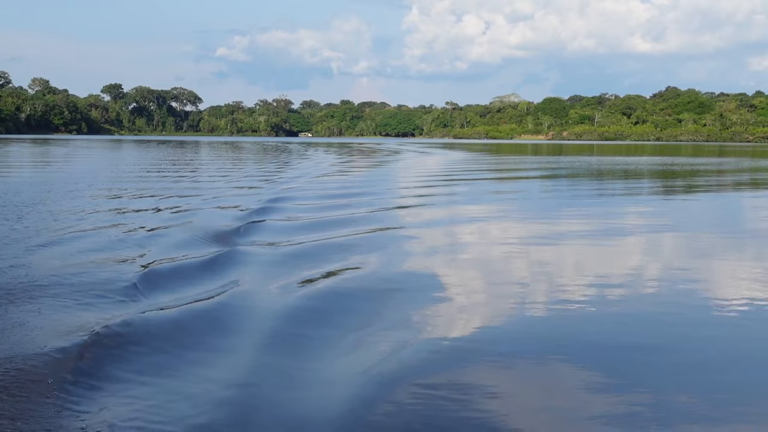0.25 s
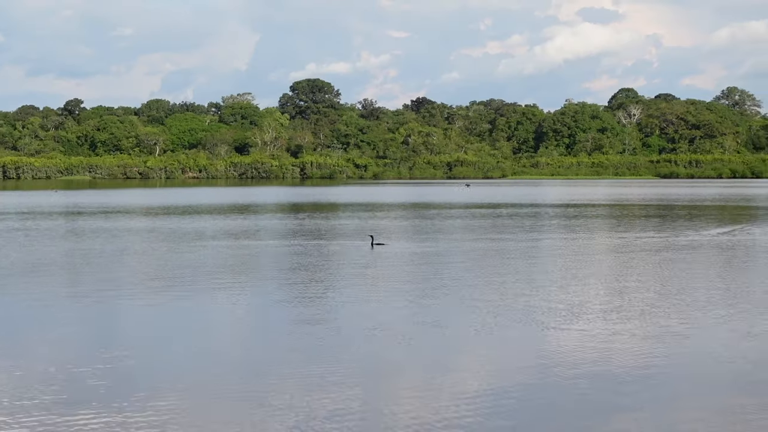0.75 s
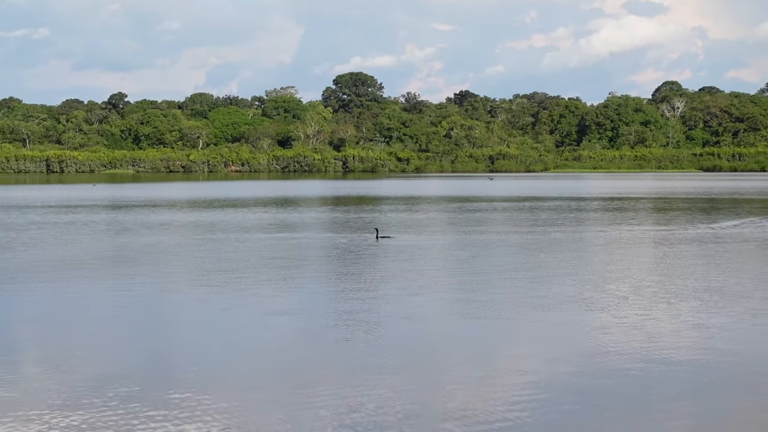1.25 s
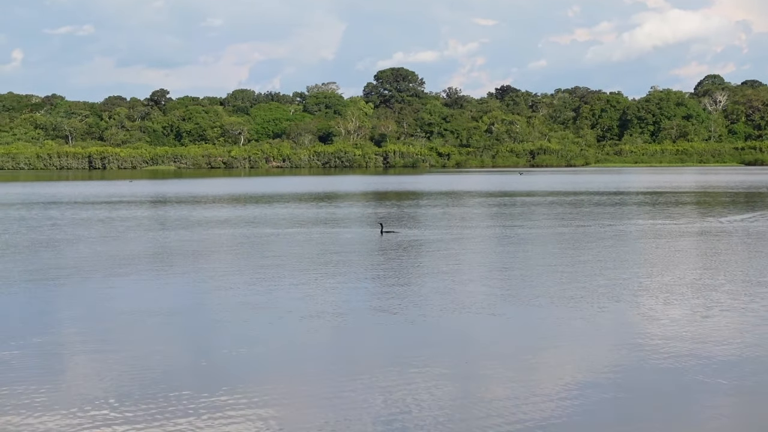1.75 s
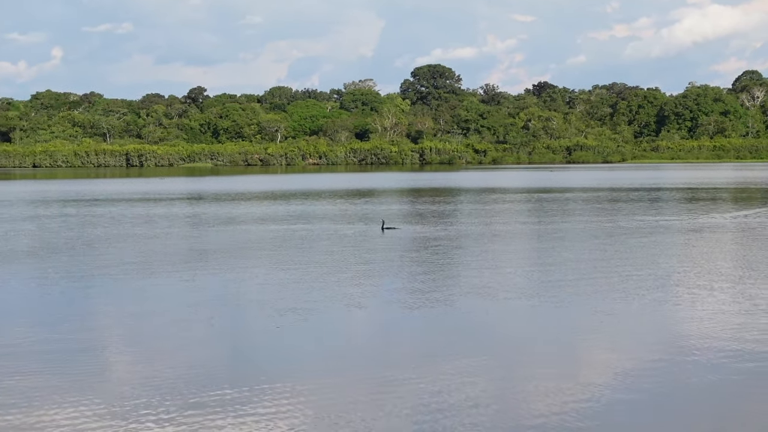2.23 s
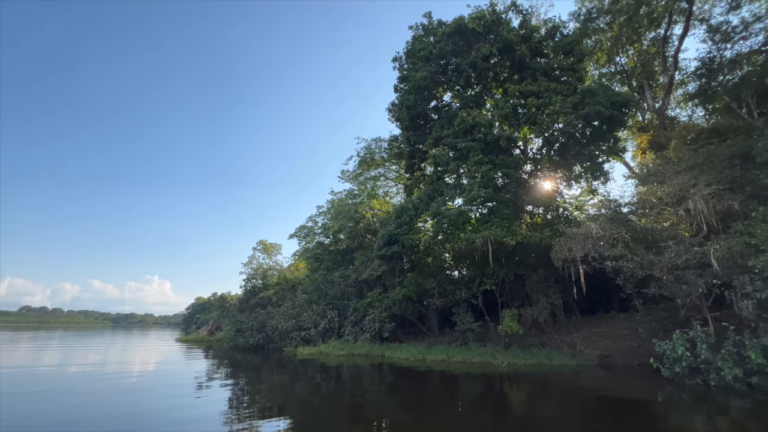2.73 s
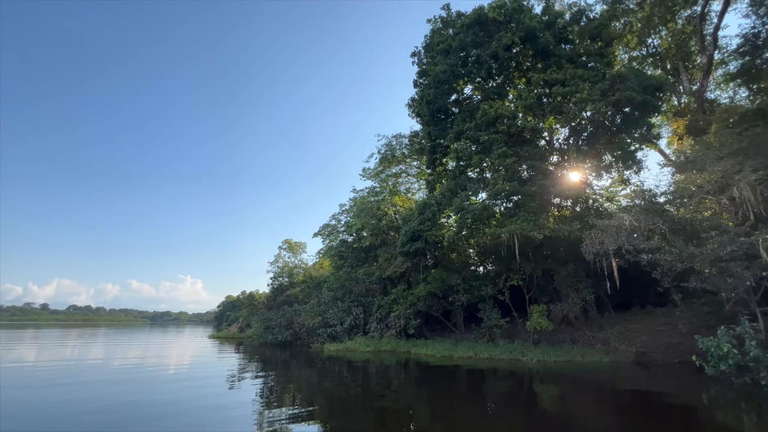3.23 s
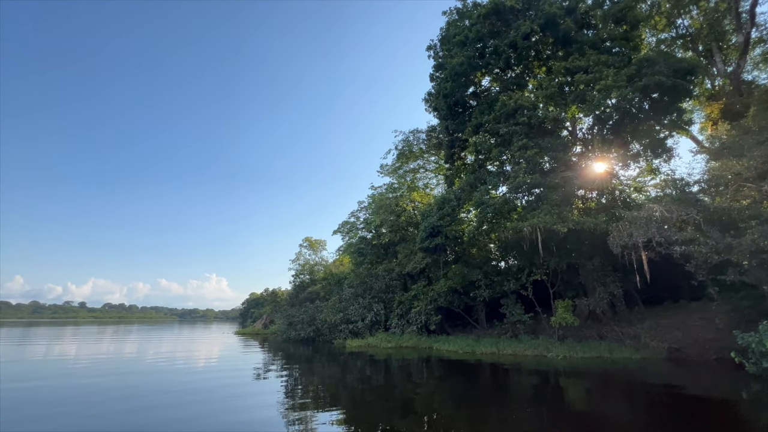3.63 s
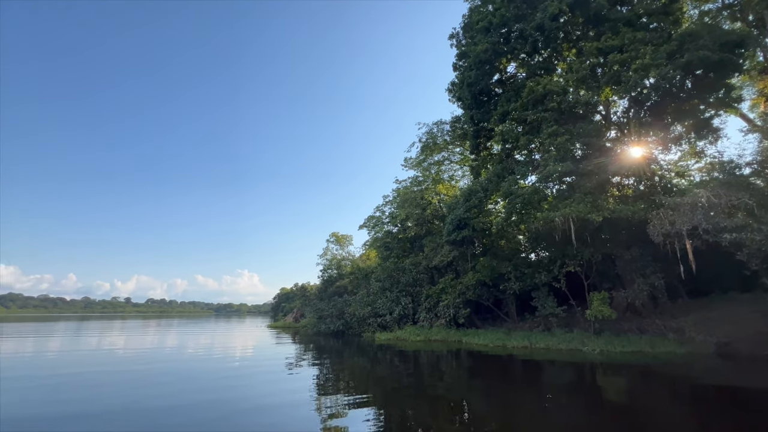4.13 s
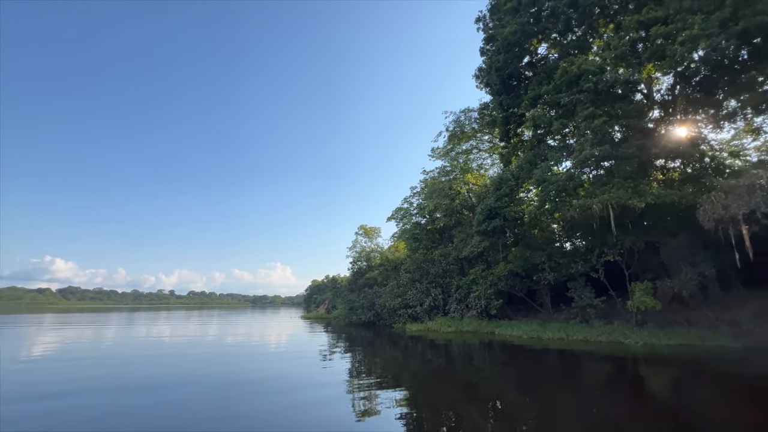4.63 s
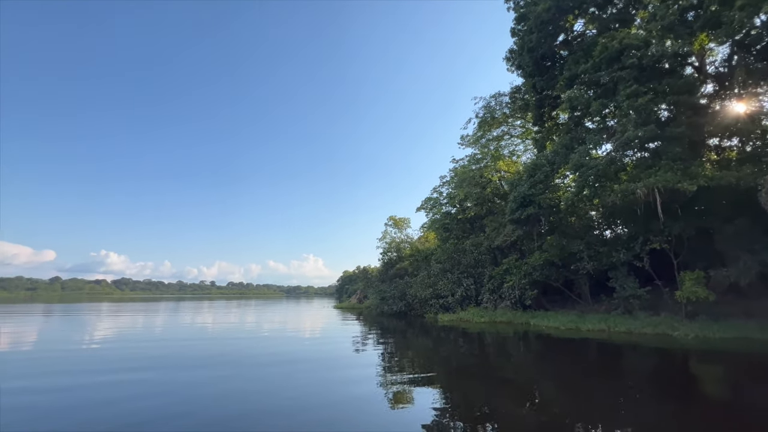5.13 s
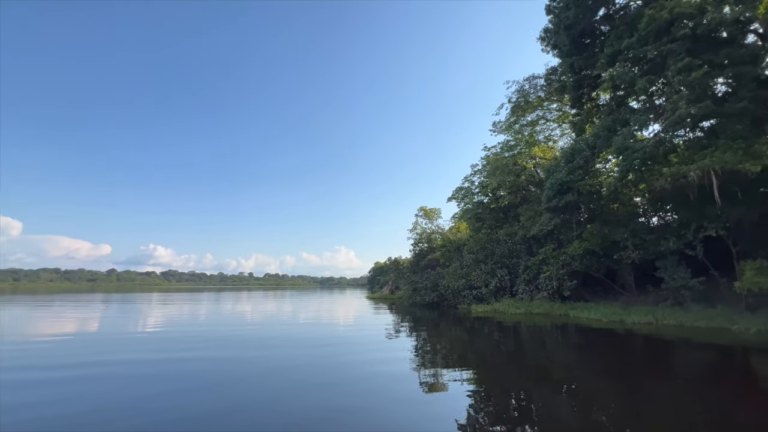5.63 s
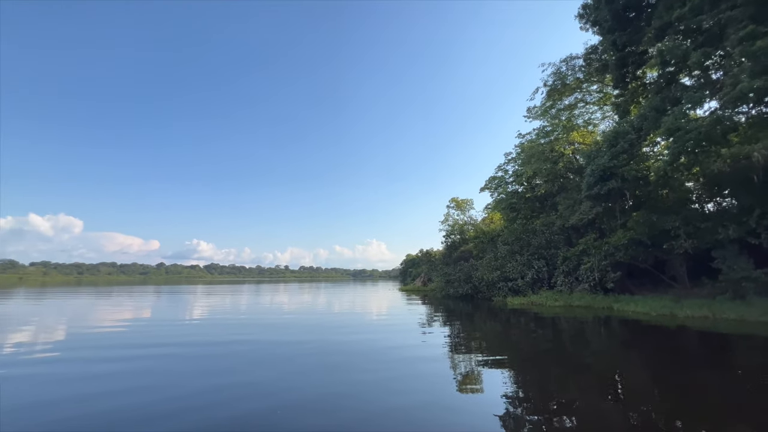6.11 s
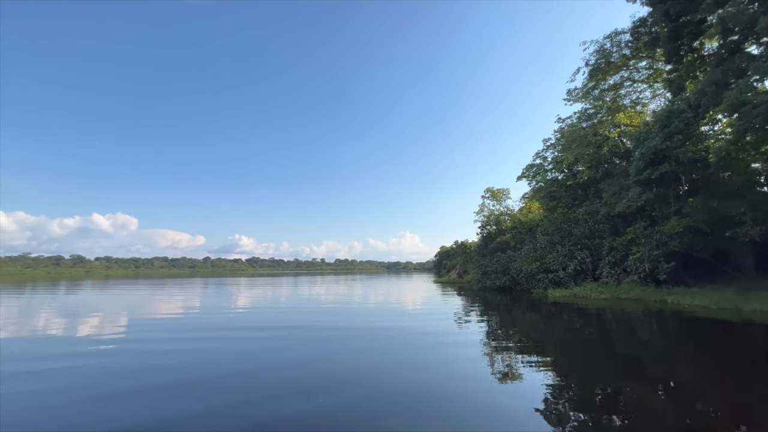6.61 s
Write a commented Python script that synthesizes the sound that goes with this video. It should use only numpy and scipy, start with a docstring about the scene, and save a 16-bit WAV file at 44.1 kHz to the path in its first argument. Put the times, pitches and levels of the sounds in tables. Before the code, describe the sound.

A small outboard motor putters close by, slows abruptly and fades, then shrill forest insects buzz while a paddle knocks on a hull.

```python
"""A small single-cylinder outboard drives a boat over a lake: exhaust throb, a clattering casing, valve taps.
It is heard close, then abruptly a little slower and further to the left, and then the sound fades out. Then the
boat drifts by a forest full of shrill insects, made of narrow bands of pulsing noise. A paddle knocks on the
hull (dying noise and low tones), water laps (soft noise), and a far bird whistles (gliding sine tones with an
echo from the trees)."""
import sys
import numpy as np
from scipy import signal
from scipy.fft import rfft, irfft, next_fast_len
from scipy.io import wavfile
from scipy.ndimage import map_coordinates

SR = 44100
rng = np.random.default_rng(int(sys.argv[2]) if len(sys.argv) > 2 else 0)


def transcribe(signal):
    """Save signal, clipped to [-1, 1], as a 16-bit WAV file at the path in sys.argv[1]."""
    frames = np.atleast_2d(signal).T
    limited = np.clip(frames, -1, 1)
    pcm = np.round(limited * 32767).astype(np.int16)
    wavfile.write(sys.argv[1], SR, pcm)


N = 302526
TIME = np.arange(N) / SR  # seconds

# Exhaust tones of the two stretches. Each row: multiple of the firing rate, level in dB.
FAST_ORDERS = [(3, -18), (4, -33), (5, -9), (6, -6), (7, -18), (8, -1), (9, -1.5), (10, -8.5), (11, -8.5),
               (12, 2), (13, -5.5), (14, -5.5), (15, -12.5), (16, -11), (17, 4), (18, -3), (19, -3),
               (22, -6), (24, -4), (31, -3)]
SLOW_ORDERS = [(3, -30), (4, -15), (5, -7.5), (6, 1.5), (7, -2.5), (8, 0), (9, -11), (10, -1.5), (11, -6.5),
               (12, 0), (14, -12), (16, -5.5), (20, 0), (21, -9), (25, -11), (33, -12)]
# Engine levels. Each row: time in seconds, exhaust in dB, clatter in dB, lift of the deepest tones in dB.
FAST_LEVEL = [(0, -17.5, -13, -1), (0.25, -22.5, -12.5, 0.5), (0.45, -21, -12, 0.5), (0.73, -21, -13, 0)]
SLOW_LEVEL = [(0.75, -21, -16.5, -5), (1.42, -22, -15.5, -5), (1.55, -21.5, -15, 0)]
# Colour of the clatter. Each row: pitch in Hz, level in dB per Hz.
FAST_CLATTER = [(30, -34), (70, -19), (130, -6), (250, 1), (450, -4.5), (800, -6), (1300, -4), (2200, -9.5),
                (3000, -15), (4000, -21.5), (6000, -26.5), (9000, -33.5), (15500, -41.5)]
SLOW_CLATTER = [(30, -35), (70, -26), (110, -12), (180, 4), (300, -0.5), (500, -3), (800, -8), (1300, -7.5),
                (2200, -12), (3400, -19.5), (5500, -23.5), (9500, -37), (15500, -43.5)]
# Resonances of the casing. Each row: pitch in Hz, width in Hz, lift in dB.
FAST_CASING = [(360, 27, 3.5), (517, 14, 4.5), (704, 19, 6), (880, 19, -1.5), (906, 13, 12), (1023, 50, 11),
               (1144, 15, 6), (1400, 25, 5), (1488, 39, 6.5), (1700, 18, 5.5), (1710, 14, -17),
               (2040, 57, 5.5), (2350, 30, -2.5), (2493, 27, 2.5), (2567, 30, 8), (2850, 70, -3.5),
               (3240, 36, 4)]
SLOW_CASING = [(165, 6.9, 3.7), (356, 18, 4), (521.5, 16, 4), (691, 41, 6.9), (895, 16, 5.8),
               (1037, 55, 13), (1307, 21, 3.9), (1424, 10, 10.6), (1515, 64, 5.3), (1680, 43, 4.4),
               (1885, 44, 9.4), (2040, 32, 7.6), (2520, 31, 4.3), (2740, 18, 1), (3040, 11, 6.1),
               (3240, 23, 6.4)]
# How far left the engine sounds. Each row: pitch in Hz, left minus right in dB.
FAST_SIDE = [(200, 0), (700, 1.5), (4400, 1.5), (8000, 0)]
SLOW_SIDE = [(60, 1), (200, -0.4), (380, 1.6), (700, 3.5), (1290, 6), (2380, 5.5), (4400, 8), (8120, 2.5),
             (11000, 6), (15000, -4)]
# How the clatter swells within a cycle. Each row: swells per cycle, depth as a share.
FAST_BEATS = [(1, 0.064), (2, 0.042), (3, 0.034), (4, 0.039)]
SLOW_BEATS = [(1, 0.056), (2, 0.051), (3, 0.047), (5, 0.046)]
# Colour of a valve tap. Each row: pitch in Hz, level in dB per Hz.
TAP_COLOUR = [(1500, -18), (2300, -1), (2650, -2), (3100, -8), (3900, -12), (5200, -14), (7500, -17),
              (10000, -25.5), (15500, -31)]
# Valve taps that stand out. Each row: time in seconds, dB over the usual.
HARD_TAPS = [(.202, 7.5), (.257, 4.5), (.312, 1.5), (.697, 4), (1.442, 6.5), (1.813, 5)]
# So small a motor radiates little deep bass. Each row: pitch in Hz, gain in dB.
SMALL_MOTOR_BASS = [(30, -6), (55, 0)]

# Colour of the mass of insects, a low and a high choir. Each row: pitch in Hz, level in dB per Hz.
LOW_CHOIR = [(4900, -39), (5500, -20), (5800, -6.5), (6080, 3.5), (6150, 1.5), (6230, 7), (6480, -28),
             (6750, 4), (6950, 3), (7060, -1), (7200, -10.5), (7700, -18.5), (8100, -60)]
HIGH_CHOIR = [(7400, -47), (7850, -19), (8150, -14), (8230, -3), (8350, -3), (8600, -7), (8770, 1),
              (8900, -6), (9020, 0.5), (9180, -20), (9320, -22), (9440, -8.5), (9620, -28), (9850, -77)]
# Bouts of buzzing of one insect. Each row: middle in seconds, length in seconds, level in dB.
BUZZES = [(3.97, .2, -67), (5.0, 0.56, -69), (6.17, 0.98, -64.5)]
# Colour of a broader insect hiss. Each row: pitch in Hz, level in dB per Hz.
SIZZLE_COLOUR = [(3800, -21), (4600, -4), (5250, 0), (5900, -1), (7000, -30)]
# Direction of the forest. Each row: time in seconds, left minus right in dB.
FOREST_BEARING = [(2.6, -2.8), (4.3, -2.3), (5.6, -1), (6.86, 0)]
# Colour of the hush of lake and forest. Each row: pitch in Hz, level in dB per Hz.
AIR_COLOUR = [(15, -50), (25, -17), (87, -12), (151, -1.5), (382, -5.5), (466, -7), (622, -8), (727, -11),
              (1040, -14), (1510, -11.5), (1840, -16), (3430, -26.5), (5000, -26.5), (6500, -54),
              (11000, -120)]
# Tones in the hush. Each row: pitch in Hz, width in Hz, lift in dB.
SHORE_TONES = [(1054, 35, 6.5), (1550, 55, 0), (1840, 76, -3), (2250, 60, 2.5)]
# Colour of the lapping water. Each row: pitch in Hz, level in dB per Hz.
LAP_COLOUR = [(50, -30), (130, -2.5), (280, -1.5), (600, -13), (1500, -21), (4500, -28), (9000, -56)]

# Paddle on the hull. Each row: time in seconds, clack in dB, lowest pitch in Hz, brightness limit in Hz,
# hull in dB, ring time of the clack as a multiple of the usual.
KNOCKS = [(3.04, -61, 100, 1500, -56.5, 0.91), (3.555, -55, 600, 3500, -72, .6),
          (3.981, -42.5, 1100, 2900, -78, 0.38), (5.647, -32, 100, 3230, -41.5, 1),
          (5.844, -35, 100, 3100, -43.5, 0.95), (6.353, -33, 100, 8500, -39.5, 1),
          (6.393, -43, 100, 3400, -47, 1)]
# Colour of the clack. Each row: pitch in Hz, level in dB per Hz.
CLACK_COLOUR = [(100, -24), (300, -2.5), (800, -10.5), (1250, -1.5), (2100, -3), (3000, -9), (5300, 4.5),
                (7500, -4), (10000, -40)]
# How long the clack rings. Each row: pitch in Hz, time to die by 60 dB in seconds.
CLACK_T60 = [(200, 0.82), (700, 0.36), (1500, 0.2), (3000, 0.11), (6000, 0.064)]
# Resonances of the clack. Each row: pitch in Hz, width in Hz, lift in dB.
WOOD = [(590, 39, 8), (915, 36, 6.5), (1266, 60, 3), (1560, 37, 4), (1850, 80, -1.5), (2220, 60, 1.5),
        (2330, 69, -3.5), (2640, 32, 4), (2940, 70, 9), (3420, 80, -1), (4380, 140, -10)]
# Low tones of the hull, varied a little per knock. Each row: pitch in Hz, level in dB,
# time to die by 60 dB in seconds.
HULL = [(92.7, -16, 0.46), (125.5, -1.5, .45), (167.5, 2, 0.53), (193.2, 0.5, .5), (249, 5.5, 0.56),
        (322, -2.5, 0.48), (409, 3, 0.39)]
# Dull booms of the hull that follow the knocks. Each row: time in seconds, pitch in Hz, level in dB,
# time to die by 60 dB in seconds.
BOOMS = [(3.145, 170, -48, .2), (5.718, 125, -36.5, .14), (5.918, 136, -35, .12), (6.414, 193, -28.5, 0.45)]
# Tones inside a boom. Each row: multiple of its pitch, level in dB.
BOOM_MODES = [(1, 0), (1.09, -7), (1.67, -10.5)]

# Far whistled notes. Each row: start in seconds, length in seconds, top pitch in Hz, fall in Hz, level in dB.
NOTES = [(3.40, .1, 3900, 90, -71.5), (3.496, 0.14, 3670, 222, -70), (3.622, .135, 3790, 420, -62.5),
         (3.828, .018, 4250, 400, -64), (4.06, .04, 4570, 90, -70), (4.115, .045, 4550, 60, -66),
         (4.18, .06, 4510, 130, -72)]
# Colour of the hoarse call. Each row: pitch in Hz, level in dB per Hz.
HOARSE_COLOUR = [(1800, -35), (2800, -1), (3600, -2), (4100, -5), (5000, -31)]

# Engine
FAST_HZ, SLOW_HZ = 18.12, 16.13  # firings a second, give or take a slight wobble
CHANGE_S = 0.738  # the slower stretch begins here
SETTLE_HZ, SETTLE_S = 0.33, 0.8  # it starts this much faster and settles in this time
FAST_FIRING_S, SLOW_FIRING_S = 0.331, 1.803  # the moment of one firing in each stretch
FADE_S, FADE_LENGTH_S = 2.283, 0.31  # the engine fades out
DEEP_HZ = 145  # the deepest exhaust tones lie below this
PUFF_SHARPNESS, PUFF_TOP_HZ = 7, 450  # each firing is a short surge of the clatter below this pitch
VALVE_LAG, VALVE_SHARPNESS = 0.17, 2.5  # share of a cycle from firing to first valve; shortness of its tap
HARD_TAP_S = 0.03  # about half a cycle

# Insects
LOW_CHOIR_DB, HIGH_CHOIR_DB = -44.5, -39
SYLLABLE_HZ, SYLLABLE_S = 12.72, 2.722  # the high insects pulse together: rate, time of one syllable
TRILL_DB, TRILL_REST_DB = -48, -69  # one insect trills, then falls almost silent
TRILL_STOP_S, TRILL_RELEASE_S = 4.58, 0.1
CHIRP_S, CHIRP_EVERY_S, CHIRP_LENGTH_S = 3.84, 0.2575, 0.14  # around one chirp, average spacing, length
CHIRP_FAR_DB, CHIRP_NEAR_DB = -52, -45.5
CHIRP_NEAR_S, CHIRP_APPROACH_S = 3.3, 0.56  # it grows louder from this time on, over this long
PULSE_DB, PULSE_PASS_DB = -51, 6  # one pulses, and swells by this much as the boat passes it
PULSE_PASS_S, PULSE_PASS_LENGTH_S = 5.55, 0.92
BUZZ_REST_DB = -76  # one buzzes faintly between its bouts
SIZZLE_S, SIZZLE_SPREAD_S, SIZZLE_DB = 3.98, 0.17, -61  # the hiss swells once with the first bout

# Lake
AIR_DB = -53.5
LAP_S, LAP_ATTACK_S, LAP_DB = 5.65, 0.23, -51.5  # the paddle stirs the water
LAP_END_S, LAP_RELEASE_S = 6.51, 0.64
BOOM_ATTACK_S = 0.0064

# Bird
NOTE_CREST, NOTE_SCOOP = 0.22, 0.7  # share of a note spent rising; the rise as a share of the fall
NOTE_EDGE_S, NOTE_END_DB = 0.011, -4  # time to start or stop; level change by its end
HOARSE_S, HOARSE_ATTACK_S = 3.42, 0.13  # a hoarse call around the whistles
HOARSE_DB, HOARSE_DB_PER_S = -63, 14.5  # its level, and how fast it dies
TREES_T60, TREES_DB = 0.8, -5  # echo of the forest edge: seconds to die by 60 dB, level

TOP_HZ = 15800  # band limit of the whole sound


def amp(db):
    """Turn decibels into a gain."""
    return 10 ** (np.asarray(db) / 20)


def unit(x):
    """Scale a sound to an average (rms) strength of 1."""
    return x / np.sqrt(np.mean(x ** 2) + 1e-20)


def along(points, hz):
    """Read (Hz, value) points at any pitch, on a log axis."""
    f, v = np.transpose(points)
    return np.interp(np.log(hz + 1), np.log(f + 1), v)


def lifts(peaks, hz):
    """The dB added by (Hz, width, dB) resonances."""
    return sum(db * np.exp(-0.5 * ((hz - centre) / width) ** 2) for centre, width, db in peaks)


def curves(rows):
    """Draw one curve over time for each column after the time."""
    s, *columns = np.transpose(rows)
    return [np.interp(TIME, s, column) for column in columns]


def ramp(start, length):
    """A straight rise from 0 to 1."""
    return np.clip((TIME - start) / length, 0, 1)


def swell(middle, length):
    """A rounded rise, hold and fall, 1 at its middle."""
    return np.exp(-(2 * (TIME - middle) / length) ** 4)


def wobble(rate):
    """A smooth random curve through `rate` random points a second."""
    points = rng.standard_normal(int(N * rate / SR) + 4)
    return map_coordinates(points, [TIME * rate])


def filtered(x, response):
    """Multiply each pitch in x by a gain that depends on its frequency."""
    m = next_fast_len(N + SR // 2)
    hz = np.fft.rfftfreq(m, 1 / SR)
    return irfft(rfft(x, m) * response(hz), m)[..., :N]


def pan(db):
    """Left and right gains for a level difference, left minus right."""
    return amp(np.array([[0.5], [-0.5]]) * db)


def noise(colour_db, side_db):
    """Stereo noise of rms 1: a part shared by both ears and a weaker opposed part."""
    mid, side = filtered(rng.standard_normal((2, N)), lambda hz: amp(colour_db(hz)))
    side = amp(side_db) * side
    return unit(np.array([mid + side, mid - side]))


def exhaust_throb(angle, orders, deep_db, waver, scatter):
    """Repeated firings make tones at multiples of the firing rate."""
    throb = 0
    for k, db in orders:
        # they line up loosely at each firing, and the higher ones waver most
        phase = scatter * rng.uniform(-np.pi, np.pi) + waver * k * wobble(14)
        throb = throb + amp(db) * np.cos(k * angle + phase)
    throb = unit(throb)
    deep = filtered(throb, lambda hz: hz < DEEP_HZ)
    return throb + (amp(deep_db) - 1) * deep


def casing_clatter(turns, angle, clatter, resonances, beats, puff, uneven_db, repeat_db, grit_db, diffuse_db):
    """The piston rattles the casing several times a cycle; its resonances colour the noise."""
    rattle = 1 + sum(depth * np.cos(k * angle + rng.uniform(0, 2 * np.pi)) for k, depth in beats)
    casing_db = lambda hz: along(clatter, hz) + lifts(resonances, hz)
    # part of the clatter comes back alike in every cycle, the rest is new each time
    cycle = irfft(np.exp(2j * np.pi * rng.random(1200)))
    place = np.arange(len(cycle)) / len(cycle)
    repeated = np.interp(turns, place, cycle, period=1)
    alike = unit(filtered(repeated, lambda hz: amp(casing_db(hz))))
    fresh = noise(casing_db, side_db=diffuse_db)
    casing = unit((fresh + amp(repeat_db) * alike) * rattle * amp(grit_db * wobble(300)))
    # its bass surges with every firing, unevenly
    bass = filtered(casing, lambda hz: 1 / (1 + (hz / PUFF_TOP_HZ) ** 6))
    firing = np.exp(PUFF_SHARPNESS * (np.cos(angle) - 1))
    surge = unit(1 + puff * firing * amp(uneven_db * wobble(16)))
    return casing - bass + bass * surge


def valve_taps(angle, diffuse_db):
    """Two valves close in each cycle, with short bright taps of uneven strength."""
    closing = np.exp(VALVE_SHARPNESS * (np.cos(2 * (angle - 2 * np.pi * VALVE_LAG)) - 1))
    hard_db = sum(db * swell(s, HARD_TAP_S) for s, db in HARD_TAPS)
    strength = amp(3.1 * wobble(30) + hard_db)
    return unit(closing * strength * noise(lambda hz: along(TAP_COLOUR, hz), side_db=diffuse_db))


def engine(rate, firing_s, level, orders, clatter, resonances, side, beats, tap_db, waver, scatter,
           puff, uneven_db, repeat_db, grit_db, diffuse_db):
    """Exhaust, casing clatter and valve taps, all tied to the firing cycle."""
    exhaust_db, clatter_db, deep_db = curves(level)
    turns = np.cumsum(rate * (1 + 0.002 * wobble(11.57))) / SR
    angle = 2 * np.pi * (turns - np.interp(firing_s, TIME, turns))  # zero at a firing
    exhaust = exhaust_throb(angle, orders, deep_db, waver, scatter)
    casing = casing_clatter(turns, angle, clatter, resonances, beats,
                            puff, uneven_db, repeat_db, grit_db, diffuse_db)
    taps = valve_taps(angle, diffuse_db)
    motor = amp(exhaust_db) * exhaust + amp(clatter_db) * (casing + amp(tap_db) * taps)
    return filtered(motor, lambda hz: pan(along(side, hz)) * amp(along(SMALL_MOTOR_BASS, hz)))


def outboard():
    """The faster stretch gives way at once to the slower one, which settles and fades out."""
    fast = engine(FAST_HZ, FAST_FIRING_S, FAST_LEVEL, FAST_ORDERS, FAST_CLATTER, FAST_CASING,
                  FAST_SIDE, FAST_BEATS, tap_db=-18.5, waver=0.0096, scatter=0.65, puff=0.6,
                  uneven_db=5.0, repeat_db=-9.5, grit_db=0.0, diffuse_db=-33)
    slow_rate = SLOW_HZ + SETTLE_HZ * (1 - ramp(CHANGE_S, SETTLE_S))
    slow = engine(slow_rate, SLOW_FIRING_S, SLOW_LEVEL, SLOW_ORDERS, SLOW_CLATTER, SLOW_CASING,
                  SLOW_SIDE, SLOW_BEATS, tap_db=-20.0, waver=0.016, scatter=0.54, puff=1.0,
                  uneven_db=2.0, repeat_db=-12.5, grit_db=0.8, diffuse_db=-22.5)
    change = ramp(CHANGE_S - 0.006, 0.02)
    return (fast * (1 - change) + slow * change) * (1 - ramp(FADE_S, FADE_LENGTH_S))


def singer(hz, half_width_hz, pulse_hz, depth):
    """One insect at rms 1: a narrow rasping resonance that swells with each stroke."""
    rasp = noise(lambda f: -10 * np.log10(1 + ((f - hz) / half_width_hz) ** 6), side_db=-11)
    stroke = 2 * np.pi * np.cumsum(pulse_hz * (1 + 0.028 * wobble(5))) / SR
    return unit(rasp * np.exp(depth * np.cos(stroke)))


def insects():
    """Two choirs of many far insects and four near ones, each a band of pulsing noise."""
    low = amp(LOW_CHOIR_DB + 0.53 * wobble(30)) * noise(lambda hz: along(LOW_CHOIR, hz), side_db=-8)

    # the high choir pulses in syllables, each of four strokes
    syllable = 2 * np.pi * SYLLABLE_HZ * (TIME - SYLLABLE_S) + 0.26 * wobble(3)
    pulsing = unit(1 + 0.067 * np.cos(syllable) + 0.13 * np.cos(4 * syllable))
    high_level = amp(HIGH_CHOIR_DB + 0.2 * wobble(27) + 0.35 * wobble(150))
    high = high_level * pulsing * noise(lambda hz: along(HIGH_CHOIR, hz), side_db=-11)

    trill_db = TRILL_DB + (TRILL_REST_DB - TRILL_DB) * ramp(TRILL_STOP_S, TRILL_RELEASE_S)
    triller = amp(trill_db) * singer(hz=6387, half_width_hz=50, pulse_hz=25.7, depth=0.19)

    chirp_times = CHIRP_S + CHIRP_EVERY_S * np.arange(-4, 12)
    chirps = sum(swell(s + rng.normal(0, 0.008), CHIRP_LENGTH_S) for s in chirp_times)
    chirp_db = CHIRP_FAR_DB + (CHIRP_NEAR_DB - CHIRP_FAR_DB) * ramp(CHIRP_NEAR_S, CHIRP_APPROACH_S)
    chirper = amp(chirp_db) * chirps * singer(hz=6997, half_width_hz=69, pulse_hz=66.6, depth=0.31)

    pulse_db = PULSE_DB + PULSE_PASS_DB * swell(PULSE_PASS_S, PULSE_PASS_LENGTH_S)
    pulses = unit(1 + 0.76 * np.cos(syllable))
    pulser = amp(pulse_db) * pulses * singer(hz=8090, half_width_hz=42.5, pulse_hz=49.4, depth=0.31)

    bouts = amp(BUZZ_REST_DB) + sum(amp(db) * swell(s, length) for s, length, db in BUZZES)
    buzzer = bouts * singer(hz=5240, half_width_hz=150, pulse_hz=40.8, depth=0.2)
    sizzle_swell = np.exp(-((TIME - SIZZLE_S) / SIZZLE_SPREAD_S) ** 2)
    sizzle = amp(SIZZLE_DB) * sizzle_swell * noise(lambda hz: along(SIZZLE_COLOUR, hz), side_db=-8)

    # the forest lies to the right and slides towards the middle as the boat turns
    bearing_db = curves(FOREST_BEARING)[0]
    lower_group = low + triller + chirper + buzzer + sizzle
    return pan(bearing_db - 3.0) * lower_group + pan(bearing_db + 0.5) * (high + pulser)


def hush():
    """Soft air over the lake, and water lapping at the drifting hull, both coloured noise."""
    air_noise = noise(lambda hz: along(AIR_COLOUR, hz) + lifts(SHORE_TONES, hz), side_db=-5)
    air = amp(AIR_DB + 0.67 * wobble(7.4)) * air_noise
    stirred = ramp(LAP_S, LAP_ATTACK_S) * (1 - ramp(LAP_END_S, LAP_RELEASE_S))
    lapping = noise(lambda hz: along(LAP_COLOUR, hz), side_db=-6)
    return air + stirred * amp(LAP_DB + 0.81 * wobble(11)) * lapping


def wooden_clack(low_hz, bright_hz, ring):
    """A burst of woody noise that darkens as it dies, since its high pitches die fastest."""
    t = TIME[:SR]
    grid = np.fft.rfftfreq(SR, 1 / SR)
    colour = amp(along(CLACK_COLOUR, grid) + lifts(WOOD, grid))
    colour = colour / np.sqrt(1 + (grid / bright_hz) ** 14 + (low_hz / (grid + 1)) ** 8)
    burst = unit(irfft(rfft(rng.standard_normal((2, SR))) * colour, SR))
    # cut into pitches and moments, so that each pitch can die at its own pace
    hz, when, pieces = signal.stft(burst, SR, nperseg=256)
    decay = amp(-60 * when / (ring * along(CLACK_T60, hz)[:, None]))
    mid, side = signal.istft(pieces * decay, SR, nperseg=256)[1][:, :SR]
    return (mid + np.array([[0.3], [-0.3]]) * side) * (1 - np.exp(-t / 0.00089))


def hull_ring():
    """The hull's low tones build up behind the clack and die away."""
    t = TIME[:SR]
    ring = 0
    for hz, db, t60 in HULL:
        level = amp(db + rng.normal(0, 2.6) - 60 * t / t60)
        pitch = hz * (1 + rng.normal(0, 0.025))
        ring = ring + level * np.sin(2 * np.pi * pitch * t + rng.uniform(0, 2 * np.pi))
    return ring * (1 - np.exp(-t / 0.029))


def paddle():
    """Each knock is a clack with the hull ringing behind it; dull booms follow some of them."""
    out, t = np.zeros((2, N + 2 * SR)), TIME[:SR]
    for s, db, low_hz, bright_hz, hull_db, ring in KNOCKS:
        knock = amp(db) * wooden_clack(low_hz, bright_hz, ring) + amp(hull_db) * hull_ring()
        out[:, round(s * SR):][:, :SR] += knock
    for s, hz, db, t60 in BOOMS:
        boom = sum(amp(level) * np.sin(2 * np.pi * k * hz * t) for k, level in BOOM_MODES)
        envelope = amp(db - 60 * t / t60) * (1 - np.exp(-t / BOOM_ATTACK_S))
        out[:, round(s * SR):][:, :SR] += boom * envelope
    return out[:, :N]


def bird():
    """Thin whistles that scoop up and sag, smeared by the trees, over a faint hoarse call."""
    call_db = HOARSE_DB - HOARSE_DB_PER_S * np.maximum(TIME - HOARSE_S - HOARSE_ATTACK_S, 0)
    call = ramp(HOARSE_S, HOARSE_ATTACK_S) * amp(call_db)
    hoarse = call * noise(lambda hz: along(HOARSE_COLOUR, hz), side_db=-4)
    whistle = np.zeros(N)
    for s, length, top_hz, fall_hz, db in NOTES:
        progress = ramp(s, length)
        hz = top_hz - fall_hz * np.interp(progress, [0, NOTE_CREST, 1], [NOTE_SCOOP, 0, 1])
        edges = ramp(s, NOTE_EDGE_S) * (1 - ramp(s + length - NOTE_EDGE_S, NOTE_EDGE_S))
        envelope = edges * amp(db + NOTE_END_DB * progress)
        whistle += envelope * np.sqrt(2) * np.sin(2 * np.pi * np.cumsum(hz) / SR)
    # the echo: many random reflections that die away
    trees = rng.standard_normal((2, SR)) * amp(-60 * TIME[:SR] / TREES_T60)
    trees = trees / np.linalg.norm(trees[0])
    echo = signal.fftconvolve(whistle[None], trees, axes=1)[:, :N]
    return hoarse + whistle + amp(TREES_DB) * echo


def scene():
    """The engine, then the forest shore, which comes in as the engine fades out."""
    motor = outboard()
    shore = insects() + hush() + paddle() + bird()
    return motor + ramp(2.535, 0.036) * shore


def record(dry):
    """The loudest peaks are rounded off; nothing passes above the band limit."""
    rounded = dry / (1 + np.abs(dry / 0.9) ** 8) ** (1 / 8)
    return filtered(rounded, lambda hz: hz < TOP_HZ)


dry = scene()
out = record(dry)
transcribe(out)
```